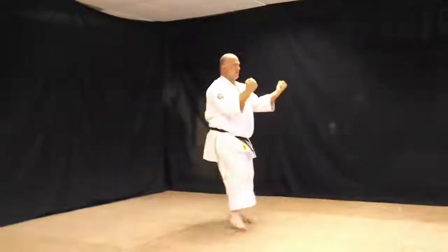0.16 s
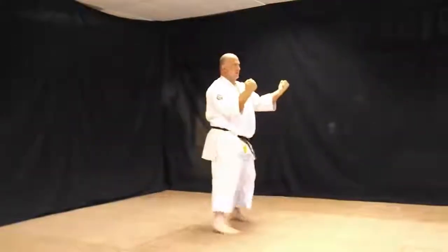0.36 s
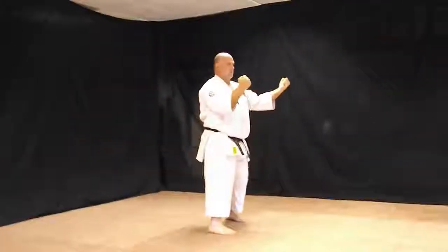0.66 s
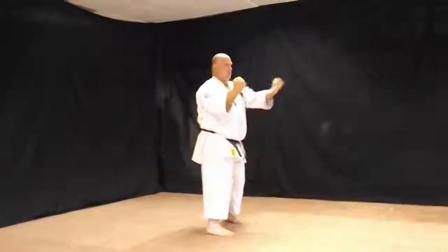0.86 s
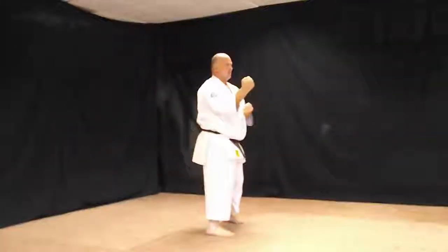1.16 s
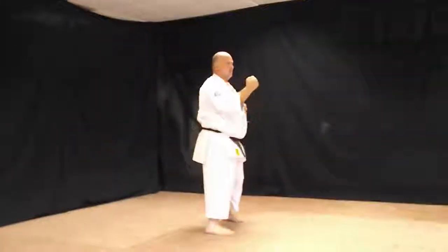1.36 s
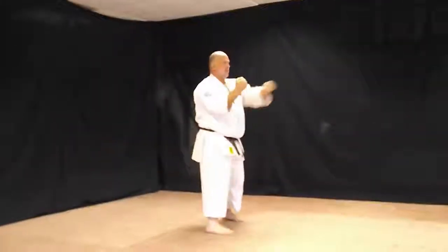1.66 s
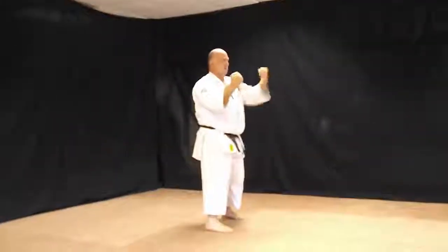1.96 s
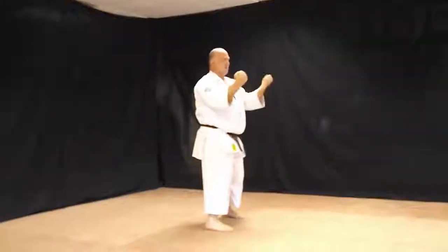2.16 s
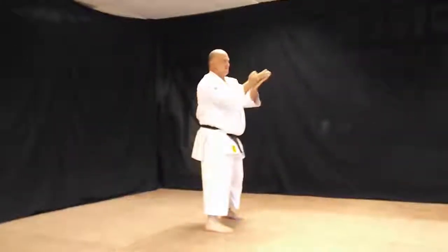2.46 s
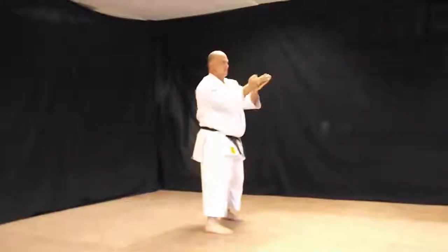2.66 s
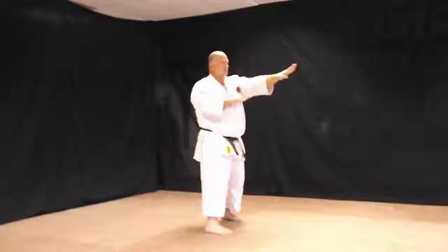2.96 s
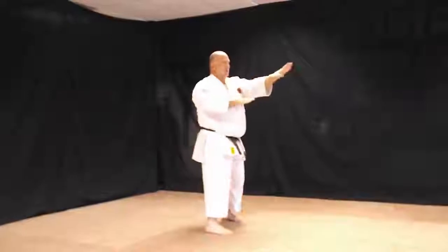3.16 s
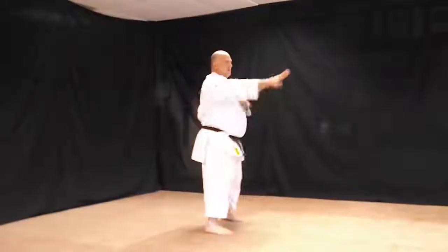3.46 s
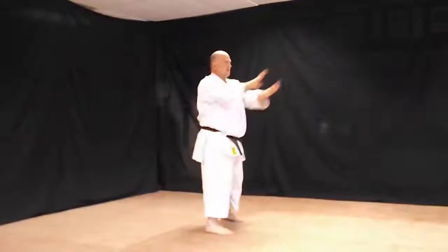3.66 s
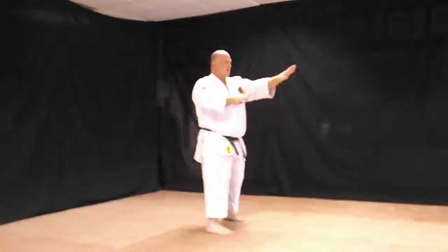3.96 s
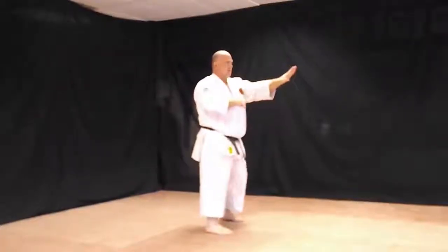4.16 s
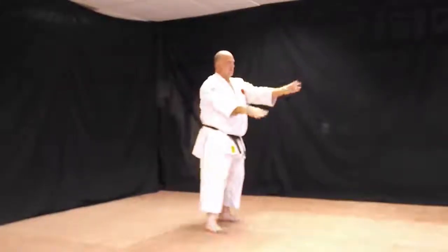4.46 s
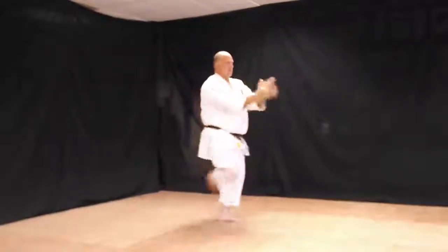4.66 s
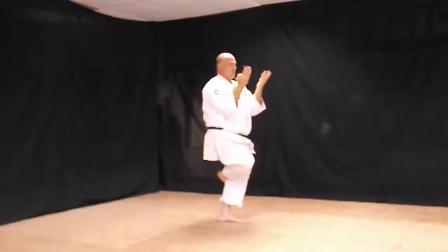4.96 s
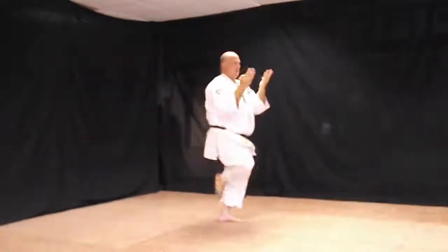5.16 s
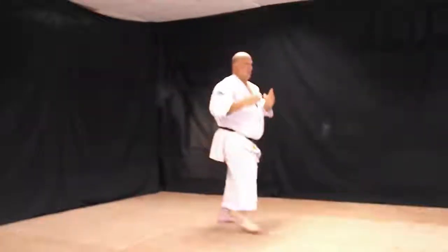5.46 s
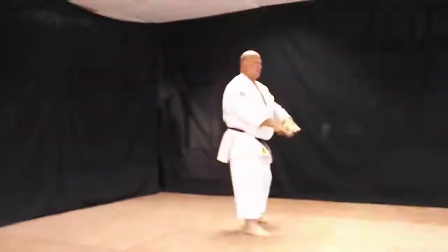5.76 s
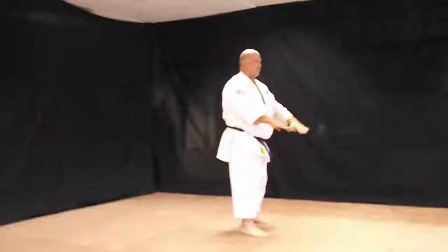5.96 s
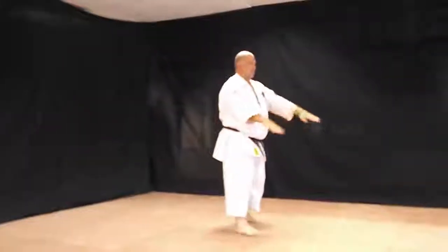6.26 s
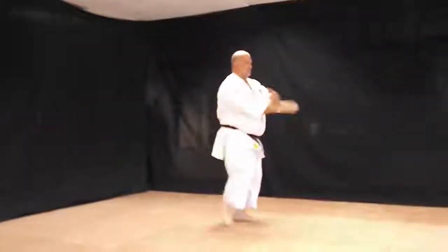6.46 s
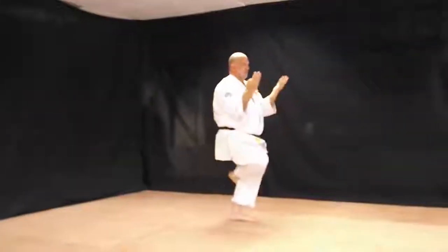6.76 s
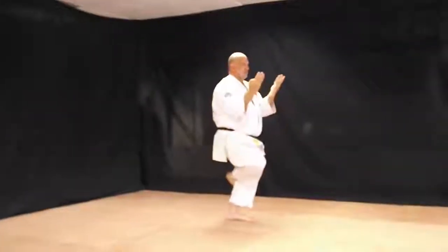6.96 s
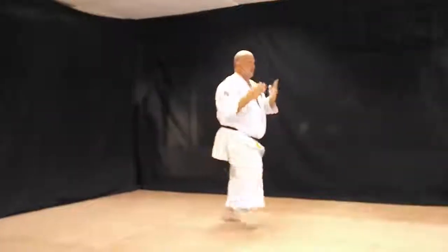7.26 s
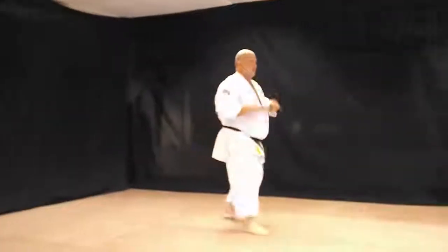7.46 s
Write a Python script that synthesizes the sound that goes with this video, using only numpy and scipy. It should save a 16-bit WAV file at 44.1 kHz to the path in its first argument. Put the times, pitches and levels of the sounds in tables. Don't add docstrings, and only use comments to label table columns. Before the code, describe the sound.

Quiet, hissy close camera noise with thin whistles and intermittent buzzing motor; beyond it, heavy cotton brushing and flapping. Slow rustles give way to one bright snap, a low cloth flap, a thumping pop with a short room ring, then busier swishes, the loudest hollow snap, bare-sole scuffs and a final sweep. A floorboard ticks and creaks faintly.

```python
import sys
import numpy as np
from scipy import signal
from scipy.fft import rfft, irfft, next_fast_len
from scipy.io import wavfile
from scipy.ndimage import uniform_filter1d

SR = 44100
rng = np.random.default_rng(int(sys.argv[2]) if len(sys.argv) > 2 else 0)


def how_loud(loudness_db):
    steps = np.asarray(loudness_db, float) / 20
    return 10 ** steps


def pcm_store(signal):
    levels = np.round(np.clip(np.atleast_2d(signal), -1, 1) * 32767)
    wavfile.write(sys.argv[1], SR, levels.astype(np.int16).T)


N = 335733

# pitch_hz, density_db (per Hz)
HISS = [(25, -19), (70, -14), (130, -10), (250, -5.5), (450, -5), (800, -2.5), (1200, -5.5), (2300, -9),
        (5000, -12.5), (8000, -13), (9600, -10), (10800, -21.5), (14300, -19.5), (16500, -45)]


def evened(x):
    return x / np.sqrt(np.mean(x ** 2) + 1e-20)


def read(points, hz):
    point_hz, value = np.transpose(points)
    return np.interp(np.log(hz + 1), np.log(point_hz + 1), value)


def add(mix, start_s, sound):
    part = mix[round(start_s * SR):][:len(sound)]
    part += sound[:len(part)]


def coloured(x, points, band=(0, SR)):
    size = next_fast_len(len(x))
    hz = np.fft.rfftfreq(size, 1 / SR)
    spectrum = rfft(x, size) * how_loud(read(points, hz))
    inside = irfft(spectrum * (hz > band[0]) * (hz < band[1]), size)
    return irfft(spectrum, size)[:len(x)] / np.std(inside)


def ring(x, hz, width_hz):
    radius = np.exp(-np.pi * width_hz / SR)
    pole = radius * np.exp(2j * np.pi * hz / SR)
    return 2 * signal.lfilter([1 - radius], [1, -pole], x).real


def gate(start_s, end_s, edge_s=0.0011):
    t = np.arange(N) / SR
    return np.clip(np.minimum(t - start_s, end_s - t) / edge_s + 0.5, 0, 1)


def wander(seconds):
    window = np.hanning(int(seconds * SR) + 3)
    return evened(signal.oaconvolve(rng.standard_normal(N), window, "same"))


def swells(peak_s, db, rise_s, fall_s, rest_db):
    ramp_db = 20
    crest = 0.052
    t = np.arange(0, N / SR + 0.002, 0.001)
    late = t[:, None] - peak_s
    away = np.maximum(-late / abs(rise_s), late / abs(fall_s))
    each_db = db - ramp_db * (np.hypot(away, crest) - crest)
    total_db = 10 * np.log10((how_loud(each_db) ** 2).sum(1) + how_loud(rest_db) ** 2)
    return np.interp(np.arange(N) / SR, t, total_db)


def focus_motor():
    # start_s, end_s
    run_times = [(0, 7.7), (.63, .64), (.23, .345), (.863, 1.4), (1.405, 1.455), (1.46, 1.5),
                 (1.8105, 1.819), (2.925, 3.222), (3.86, 4.21), (4.215, 4.27), (5.89, 6.3), (6.3, 6.5),
                 (6.995, 7.35)]
    # low_modes_db, middle_modes_db, high_modes_db, split_high_modes_db
    run_levels = [(-78.5, -82.5, -76, -90), (-74, -66, -70, -76), (-68, -66, -63, -68),
                  (-65, -65, -59.5, -77), (-70, -65, -65, -67), (-70, -67, -69, -75), (-72, -60, -64, -66),
                  (-66, -60.5, -62.5, -70), (-66, -62.5, -61, -74), (-75, -76, -91, -76),
                  (-71, -57, -68.5, -63.5), (-71, -59, -68, -70), (-69, -59, -61, -69)]
    # pitch_hz, width_hz, level_db
    housing = [
        [(6300, 130, -1), (6420, 120, -3), (6540, 110, 0)],
        [(6800, 200, 0), (7250, 300, -7)],
        [(8030, 200, -5), (8155, 110, 2), (8300, 220, -6), (9650, 500, -17), (10200, 350, -16)],
        [(8030, 220, 0), (8200, 250, -4), (8390, 220, -2)],
    ]
    steps_per_s, clean_share = 122, 0.45
    turns = steps_per_s * np.arange(N) / SR + 0.02 * wander(0.035)
    steps = evened(np.diff(np.floor(turns), prepend=0))
    after_step = 0.85 + np.exp(-(turns % 1) / 0.21)
    rattle = evened(rng.standard_normal(N) * after_step * how_loud(0.6 * wander(0.016)))
    drive = np.sqrt(clean_share) * steps + np.sqrt(1 - clean_share) * rattle
    group_drives = np.zeros((len(housing), N))
    for (start_s, end_s), levels_db in zip(run_times, run_levels):
        group_drives += how_loud(np.array(levels_db))[:, None] * drive * gate(start_s, end_s)
    body = np.zeros(N)
    for group_drive, modes in zip(group_drives, housing):
        for hz, width_hz, db in modes:
            resonance = ring(ring(group_drive, hz, width_hz), hz, width_hz)
            body += how_loud(db) * resonance * np.sqrt(SR / width_hz)
    return how_loud(-4.5) * body


def steady_whines():
    # pitch_hz, level_db
    tones = [
        (59, -92),
        (9778.6, -69),
        (11714, -88),
    ]
    t = np.arange(N) / SR
    out = np.zeros(N)
    for hz, db in tones:
        level = np.sqrt(2) * how_loud(db + 1.9 * wander(0.031))
        out += level * np.sin(2 * np.pi * hz * t + 0.25 * wander(0.12))
    return out


def holding_whistle():
    # start_s, end_s, level_db
    holds = [(0, 0.275, -62.5), (1.477, 1.617, -62.5), (1.87, 2.143, -63), (2.868, 2.915, -64),
             (4.224, 4.413, -64), (4.863, 5.144, -63), (6.58, 6.643, -62), (6.865, 6.982, -64.5)]
    hold_hz, flicker_hz, fuzz_width_hz = 10148, 92, 170
    t = np.arange(N) / SR
    flicker = 1 + 0.7 * np.sin(2 * np.pi * flicker_hz * t + 0.6 * wander(0.05))
    whistle = flicker * np.sin(2 * np.pi * hold_hz * t + 1.1 * wander(0.02))
    noise = rng.standard_normal(N)
    fuzz = evened(ring(ring(noise, hold_hz, fuzz_width_hz), hold_hz, fuzz_width_hz))
    level = sum(how_loud(db) * gate(start_s, end_s) for start_s, end_s, db in holds)
    return (whistle + 0.39 * fuzz) * level


def microphone_hiss():
    level_db = -64 + 1.22 * wander(0.55)
    return how_loud(level_db) * coloured(rng.standard_normal(N), HISS, (20, 9600))


def cloth():
    # peak_s, level_db, rise_s, fall_s
    flap_moves = [(0.004, -65, .02, 0.21), (.29, -67, 0.27, 0.16), (.53, -69.5, 0.39, 0.98),
                  (1.15, -70.5, 0.18, 0.4), (1.27, -65.5, 0.16, 0.24), (1.74, -67, 0.46, 0.43),
                  (2.06, -69, 0.19, 0.49), (2.34, -66.5, 0.083, .3), (2.868, -49, 0.037, 0.11),
                  (3.1, -70, 0.63, 0.49), (3.462, -66.5, 0.17, 0.088), (3.648, -71, .03, 0.028),
                  (3.8, -59.5, 0.25, 0.29), (4.053, -63, 0.027, 0.21), (4.35, -70.5, .05, 0.27),
                  (4.54, -65, 0.13, 0.45), (4.71, -56.5, 0.094, 0.33), (4.81, -57, 0.27, 0.043),
                  (5.2, -69, 0.18, .5), (5.51, -63.5, 0.16, 0.46), (5.664, -56.5, 0.25, 0.085),
                  (5.803, -51, 0.096, 0.13), (6.289, -60.5, 0.014, 0.045), (6.36, -76, 0.046, .1),
                  (6.5, -60.5, 0.21, 0.46), (6.66, -52.5, 0.066, 0.13), (7.1, -68, 0.1, 0.33),
                  (7.3, -66.5, 0.086, 0.27), (7.466, -55.5, 0.13, 0.28), (7.61, -50, 0.032, 0.085)]
    # peak_s, level_db, rise_s, fall_s
    rub_moves = [(0.002, -51, .02, 0.041), (.04, -61.5, .05, .3), (.26, -61, .15, 0.29),
                 (.45, -66, 0.25, .12), (.8, -75, 0.62, 0.24), (1.264, -61, 0.55, 0.23),
                 (1.76, -66.5, 0.43, 0.26), (2.875, -52.5, 0.038, 0.12), (3.22, -67.5, 0.23, 0.055),
                 (3.46, -56, 0.061, 0.11), (3.648, -65, .03, 0.033), (3.73, -59.5, 0.067, 0.36),
                 (4.053, -67, .06, 1), (4.35, -63.5, 0.019, 0.11), (4.48, -57, 0.15, 0.22),
                 (4.808, -62, 0.23, 0.094), (5.2, -64.5, .28, 0.26), (5.362, -72, 0.11, 0.15),
                 (5.476, -67.5, 0.13, .1), (5.528, -52, 0.017, 0.12), (5.664, -53.5, 0.078, 0.11),
                 (5.79, -53.5, 0.12, 0.13), (6.29, -57, 0.04, 0.15), (6.384, -60.5, 0.061, 0.056),
                 (6.44, -60, 0.046, 0.22), (6.69, -58.5, 0.12, 0.17), (7.1, -65.5, 0.28, 0.22),
                 (7.372, -56.5, 0.026, 0.36), (7.48, -59.5, 0.27, 0.26), (7.61, -54, 0.039, .1)]
    # peak_s, rustle_db, rise_s,
    # fall_s, fizz_over_rustle_db
    strokes = [(0.004, -51, 0.036, 0.23, -6.5), (.204, -53.5, 0.067, 0.17, -7.5),
               (2.39, -56.5, .008, 0.24, -14), (2.868, -62.5, 0.098, 0.17, -7),
               (3.462, -65.5, 0.073, 0.18, -8), (3.728, -69, 0.13, 0.67, -3),
               (3.745, -50.5, 0.02, 0.11, -8), (4.362, -60.5, 0.017, 0.18, -9),
               (4.445, -50, 0.056, 0.23, -8.5), (4.505, -49, 0.16, 0.12, -3.5),
               (4.555, -56, 0.16, 0.051, -1), (5.521, -58, 0.012, 0.03, -7),
               (5.545, -56.5, 0.024, 0.14, -5), (5.664, -55, 0.054, 0.056, -8),
               (5.775, -47, 0.074, .13, -7.5), (6.29, -57.5, 0.035, 0.12, -4), (6.356, -59, .015, .1, -4),
               (6.384, -52.5, 0.047, 0.065, -6), (6.44, -58, 0.022, 0.12, 1), (6.47, -54, 0.061, 0.13, -2),
               (6.69, -61.5, 0.19, 0.2, -8), (7.372, -49.5, 0.028, 0.12, -6), (7.506, -52, 0.038, 0.11, -8),
               (7.61, -52, 0.02, 0.085, -1.5)]
    # peak_s, rustle_db, rise_s, fall_s, fizz_over_rustle_db
    shifts = [(.29, -59.5, 0.23, 0.18, -4.5), (.44, -63.5, 0.22, 0.15, -9), (.7, -75, 0.42, .6, -3),
              (1.264, -63.5, 0.56, 0.19, -6), (1.74, -71, 0.61, 0.37, -5), (2.05, -71, 0.39, 0.14, -4.5),
              (3.07, -71, 0.33, 0.62, -2.5), (4.06, -65, 0.038, 0.3, -8), (4.18, -71, 0.2, 0.13, -5),
              (4.76, -63, 0.26, 0.32, -7.5), (5.2, -64, 0.24, 0.28, -6.5), (7.1, -61, 0.17, .18, -4)]
    # pitch_hz, density_db (per Hz)
    flap_colour = [(100, -43), (200, -10.5), (350, 0.5), (600, 1.5), (850, 3), (1200, -10.5), (2500, -12.5),
                   (4000, -44)]
    rub_colour = [(600, -25), (950, -3), (1150, -2.5), (1400, -2.5), (1750, -4), (2300, -5.5), (3300, -9.5),
                  (5000, -41)]
    rustle_colour = [(1800, -32), (2600, -5.5), (3300, -4), (3900, -1), (5500, -1), (6500, -5), (9000, -44)]
    fizz_colour = [(4500, -35), (6000, -4), (7000, 2.5), (8200, 1.5), (9100, -2.5), (10500, -7.5),
                   (13000, -19), (15500, -43), (17000, -53)]
    # low_hz, high_hz
    level_bands = [
        (250, 800),
        (1000, 2100),
        (3500, 5800),
        (8700, 9500),
    ]
    # flap_db, rub_db, rustle_db, fizz_db
    rests_db = (-79.5, -88, -97, -82.5)
    peak_s, rustle_db, rise_s, fall_s, bright_db = np.transpose(strokes + shifts)
    moves = [np.transpose(flap_moves), np.transpose(rub_moves),
             (peak_s, rustle_db, rise_s, fall_s), (peak_s, rustle_db + bright_db, rise_s, fall_s)]
    colours = [flap_colour, rub_colour, rustle_colour, fizz_colour]
    slips, lumps = wander(0.0035), wander(0.06)
    clump_depths_db = [(1.36, 1.0), (1.2, 0.8), (0.65, 0.5), (0.85, 0.5)]
    out = np.zeros(N)
    for move, rest_db, (slip_db, lump_db), colour, band in zip(
            moves, rests_db, clump_depths_db, colours, level_bands):
        fibres = coloured(rng.standard_normal(N), colour, band)
        clumps = evened(how_loud(slip_db * slips + lump_db * lumps))
        out += fibres * clumps * how_loud(swells(*move, rest_db))
    return out


def friction(table, width_hz):
    noise = rng.standard_normal(N) * how_loud(2.0 * wander(0.0044))
    out = np.zeros(N)
    for peak_s, db, rise_s, fall_s, hz in table:
        near = slice(max(round((peak_s - 0.4) * SR), 0), round((peak_s + 0.4) * SR))
        hollow = evened(ring(ring(noise[near], hz, width_hz), hz, width_hz))
        level_db = swells(np.array([peak_s]), db, rise_s, fall_s, -130)
        out[near] += hollow * how_loud(level_db[near])
    return out


def scuffs():
    # peak_s, level_db, rise_s, fall_s, pitch_hz
    scuff_moves = [(0.201, -57, 0.026, 0.11, 1400), (0.27, -59, 0.071, 0.11, 1280),
                   (1.267, -56, 0.16, 0.11, 700), (3.79, -50.5, 0.13, 0.1, 1030),
                   (4.41, -54, 0.04, 0.22, 1630), (4.5, -55, 0.25, 0.12, 1400),
                   (6.355, -56, .006, 0.074, 1310), (6.382, -59, .04, .03, 1480),
                   (6.435, -55, .015, 0.031, 1620), (.635, -67, .01, .04, 2500),
                   (.84, -63, .015, .03, 2650), (.972, -65, .02, .03, 2550), (1.085, -60, 0.013, .03, 2500),
                   (5.57, -48, .03, .2, 1500), (5.555, -49, 0.027, 0.18, 2030),
                   (3.82, -52, 0.046, 0.09, 1000), (4.083, -59, .01, 0.028, 2530),
                   (7.43, -58, .04, .08, 1700), (7.505, -58, .03, .1, 1700), (2.88, -52, 0.034, .08, 880),
                   (1.18, -68, 0.11, 0.09, 770), (1.71, -68, 0.2, 0.13, 750),
                   (7.45, -54.5, 0.069, 0.088, 900), (7.51, -52.5, .03, 0.087, 1100)]
    return friction(scuff_moves, width_hz=550)


def whisks():
    # peak_s, level_db, rise_s, fall_s, pitch_hz
    whisk_moves = [(.205, -51.5, .06, .05, 4470), (.21, -63, .06, .1, 7500), (2.445, -60, .04, .1, 5000),
                   (5.545, -54, 0.023, .08, 3780), (6.7, -63, .1, .08, 2300), (7.1, -60, 0.12, .1, 2200),
                   (3.738, -51, 0.01, 0.099, 2970), (4.46, -54, 0.06, .1, 4000), (4.52, -52, 0.1, .1, 8200),
                   (5.75, -49.5, 0.033, .06, 8000), (5.78, -58, .06, 0.074, 4240),
                   (6.46, -59, .05, .1, 8100), (7.385, -57, .06, 0.062, 8000)]
    return friction(whisk_moves, width_hz=1300)


def pop(hz, cycles):
    turns = hz * np.arange(1024) / SR
    decay = how_loud(-60 * turns / cycles)
    onset = 1 - np.exp(-turns / 0.53)
    return np.sin(2 * np.pi * turns) * decay * onset * 1.56


def room_tail():
    # pitch_hz, t60_s
    decay_times = [(250, 0.36), (660, 0.47), (1740, 0.22), (4590, 0.26), (8000, 0.23)]
    hz, t, bands = signal.stft(rng.standard_normal(SR // 2), SR, nperseg=256)
    fading = bands * how_loud(-60 * t / read(decay_times, hz)[:, None])
    tail = signal.istft(fading, SR, nperseg=256)[1]
    tail = tail * np.clip(np.arange(len(tail)) / SR / 0.0047, 0, 1)
    return tail / np.linalg.norm(tail)


def snaps():
    # start_s, peak_db, pocket_hz, room_db
    tick_events = [(.633, -46, 2500, -2), (0.838, -45, 2600, -12), (0.971, -51, 2500, -8),
                   (1.084, -44, 2470, -4), (1.913, -44, 2400, -4), (2.880, -42, 805, -3),
                   (3.2641, -50, 2000, 0), (3.357, -44, 746, -12), (3.394, -51, 730, 4),
                   (3.7335, -31.5, 740, -1), (3.7459, -26.5, 1710, -1.5), (3.751, -30, 2000, -10),
                   (3.9656, -44, 2500, -18), (4.082, -43, 2550, 0), (5.529, -37, 1090, -8),
                   (5.5342, -17.5, 1420, -6.5), (5.5382, -17, 1360, -4), (5.5401, -23.5, 1300, -3.5),
                   (5.5496, -25, 1400, -8), (5.556, -29, 1250, -17), (5.5341, -35, 1990, 0),
                   (5.5372, -32, 1980, 5), (6.287, -49, 730, -8), (6.434, -35, 1620, -10)]
    # start_s, peak_db, pocket_hz,
    # room_db
    crack_events = [(2.3752, -21.5, 8250, -7), (2.376, -21.5, 4700, -7), (2.3773, -32, 8200, -5),
                    (2.378, -26, 3730, -7), (2.3822, -31, 8500, -14), (2.3835, -22.5, 5800, -15),
                    (2.386, -36, 7500, -8), (2.3905, -33, 5000, -14), (2.3932, -34, 8800, -10),
                    (2.3924, -34.5, 1520, -13), (2.3945, -26.5, 6100, -8), (2.3952, -29, 5500, -14),
                    (2.399, -36, 7500, -6), (2.4108, -42, 5000, -6), (2.431, -39, 5200, -4),
                    (2.446, -36.5, 5000, 2), (2.458, -44, 6000, -4), (2.867, -40.5, 1270, 4),
                    (4.035, -43.5, 1280, -2), (5.5215, -43, 4500, -14), (5.5334, -39, 7800, -5),
                    (5.5485, -42, 7600, -12), (5.642, -42, 2530, -5), (6.352, -47.5, 1410, 5),
                    (7.4897, -37, 7500, -14), (7.4935, -42, 7000, -14), (7.4993, -38, 7500, -14),
                    (7.5035, -42, 6000, -13), (7.521, -46, 7500, -12)]
    # start_s, peak_db, pocket_hz, room_db
    thump_events = [(.646, -46.5, 920, -14), (0.749, -45.5, 804, -19), (.838, -53.5, 604, -18),
                    (1.082, -49, 800, -10), (3.45, -40, 715, -6.5), (3.7446, -23, 1120, -6),
                    (3.7467, -23, 1020, -2), (3.7521, -27.5, 910, -10.5), (3.7565, -34, 1000, -3),
                    (3.7645, -29.5, 885, -9), (4.798, -45, 620, -6), (6.686, -57, 553, -10),
                    (7.4225, -34.5, 1310, -17), (7.428, -41, 800, -9), (7.504, -34, 1200, -14)]
    # thud_db, tearing_db
    kinds = [
        (-26, -21),
        (-43, 3),
        (-7.5, -8),
    ]
    # pitch_hz, density_db (per Hz)
    crack_colour = [(300, -21.5), (1000, -10), (2000, -11.5), (3200, -7.5), (4500, -5.5), (6000, -2.5),
                    (7800, 0), (9300, -5.5), (11000, -13.5), (14000, -25), (17000, -46)]
    lead = 64
    tear_s, thud_hz = 0.00057, 487
    tails = [room_tail() for _ in range(3)]
    u = np.arange(1024) - lead
    tear_fade = np.exp(-abs(u) / SR / tear_s) * (u > 0)
    rows = []
    for table, kind in zip((tick_events, crack_events, thump_events), kinds):
        rows += [row + kind for row in table]
    out = np.zeros(N)
    for k, (start_s, db, hz, room_db, thud_db, tearing_db) in enumerate(rows):
        tearing = (u == 0) + 0.7 * rng.standard_normal(len(u)) * tear_fade
        soften = np.exp(-2 * np.pi * 4.5 * hz / SR)
        crack = signal.lfilter([1], [1, -soften], coloured(tearing, crack_colour))
        body = np.roll(pop(hz, 7.3) + how_loud(thud_db) * pop(thud_hz, 4.6), lead)
        snap = body + how_loud(tearing_db) * crack / abs(crack).max()
        add(out, start_s - lead / SR, how_loud(db) * snap)
        reflections = signal.fftconvolve(snap, tails[k % len(tails)])
        add(out, start_s + 0.00102, how_loud(db + room_db + 5.0) * reflections)
    return signal.sosfilt(signal.butter(3, 220, "high", fs=SR, output="sos"), out)


def motor_jolt():
    start_s, level_db, pitch_hz, t60_s = 1.8109, -40.5, 6900, 0.019
    t = np.arange(2048) / SR
    decay = how_loud(level_db - 60 * t / t60_s)
    out = np.zeros(N)
    add(out, start_s, np.sin(2 * np.pi * pitch_hz * t) * decay * (1 - np.exp(-t / 0.0003)))
    return out


def creaks():
    # start_s, peak_db
    slip_events = [(1.9114, -54), (3.2632, -42.5), (3.266, -52), (3.268, -51), (3.2737, -48), (3.2773, -50),
                   (3.2854, -50), (3.2883, -53), (3.296, -57), (3.965, -46.5), (3.9686, -54)]
    top_hz, low_hz, drop_s, t60_s = 2700, 1000, 0.0004, 0.015
    t = np.arange(2048) / SR
    hz = low_hz + (top_hz - low_hz) * np.exp(-t / drop_s)
    decay = how_loud(-60 * t / t60_s)
    chirp = -np.sin(2 * np.pi * np.cumsum(hz) / SR) * decay * (1 - np.exp(-t / 0.0001))
    out = np.zeros(N)
    for start_s, db in slip_events:
        add(out, start_s, how_loud(db + 2.5) * chirp)
    return out


def scene():
    camera = focus_motor() + steady_whines() + holding_whistle() + microphone_hiss() + motor_jolt()
    fighter = cloth() + scuffs() + whisks() + snaps()
    return np.tile(camera + fighter + creaks(), (2, 1))


def low_pass(x):
    return signal.sosfilt(signal.butter(12, 15760, fs=SR, output="sos"), x)


def record(dry):
    notch_hz, notch_width_hz = 7000, 60
    notch = signal.iirnotch(notch_hz, notch_hz / notch_width_hz, SR)
    size = next_fast_len(N)
    hz = np.fft.rfftfreq(size, 1 / SR)
    mid_spectrum = rfft(signal.lfilter(*notch, dry.mean(0)), size)
    late = -1j * np.tan(np.pi * np.minimum(hz, 14500) / SR) * mid_spectrum
    treble = np.clip((hz - 4000) / 400, 0, 1)
    own_hiss = how_loud(-78.0) * rfft(coloured(rng.standard_normal(N), HISS, (4000, SR)), size)
    mid = irfft(mid_spectrum, size)[:N]
    low_side = irfft(late * (1 - treble), size)[:N]
    high_side = irfft((late + own_hiss) * treble, size)[:N]
    strength_db = 10 * np.log10(abs(uniform_filter1d(low_side ** 2, size=700)) + 1e-20)
    side = high_side + low_side * np.clip((strength_db + 60) / 4, 0, 1)
    return low_pass(np.array([mid + side, mid - side]))


dry = scene()
out = record(dry)
pcm_store(out)
```